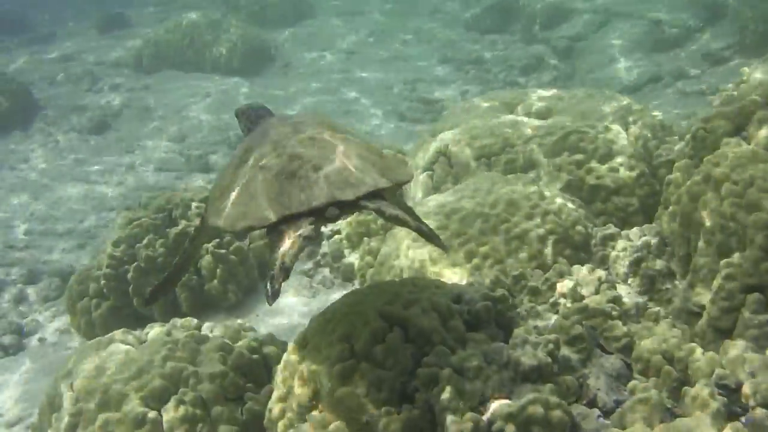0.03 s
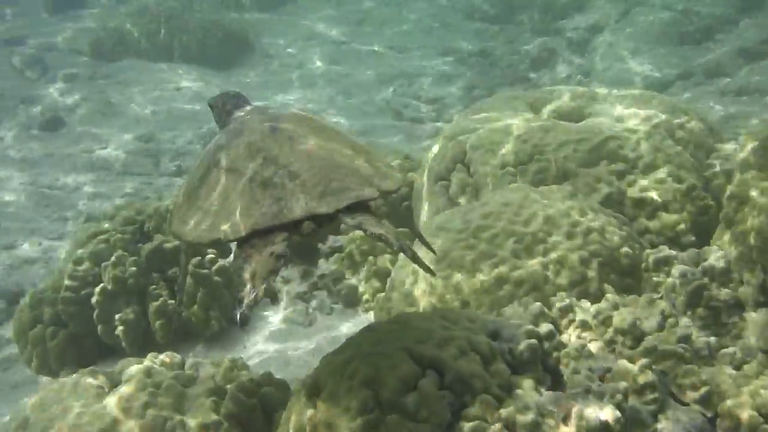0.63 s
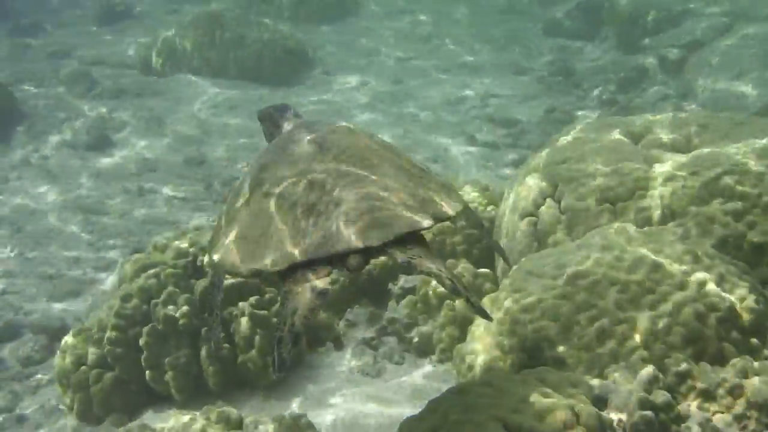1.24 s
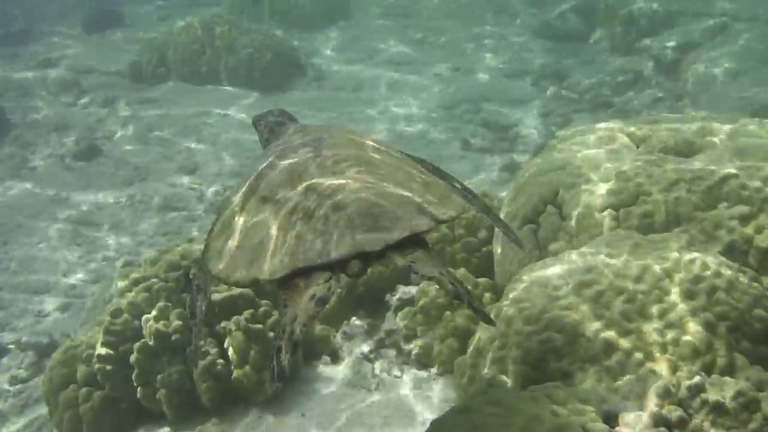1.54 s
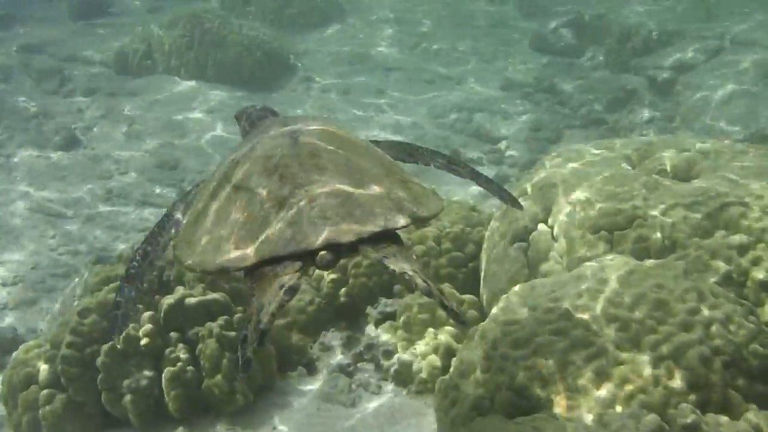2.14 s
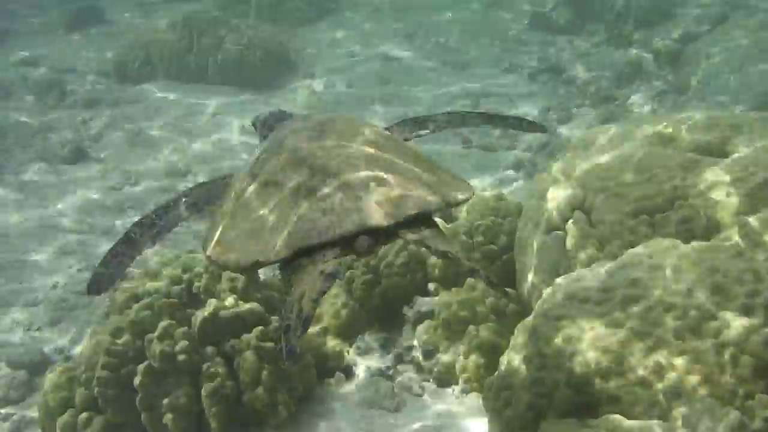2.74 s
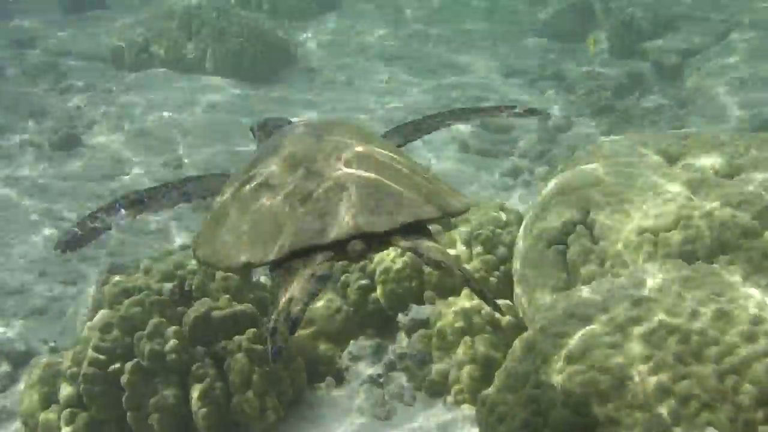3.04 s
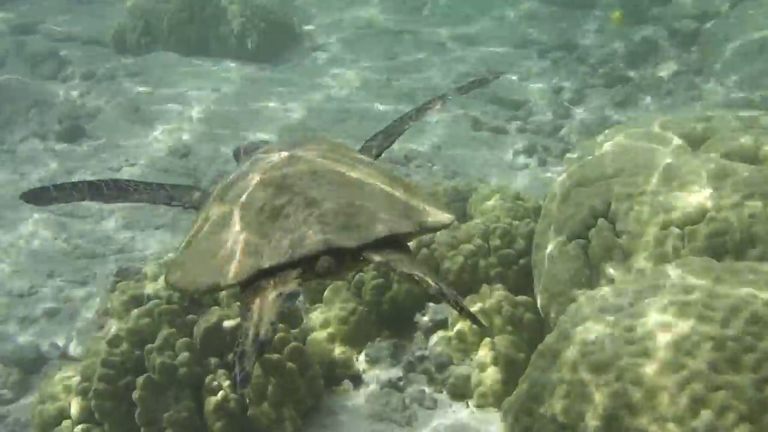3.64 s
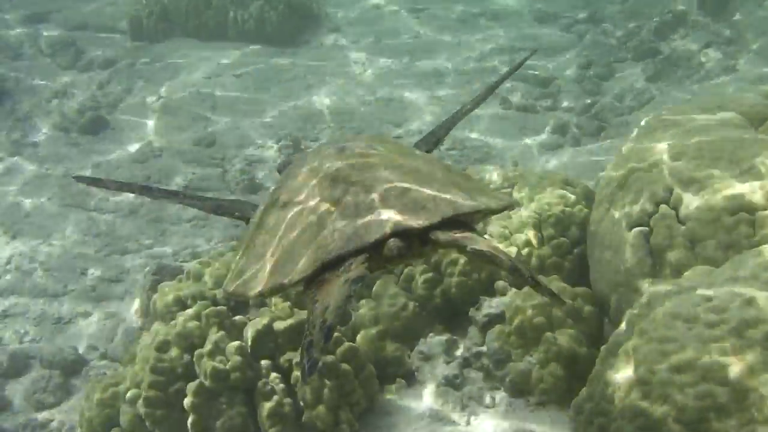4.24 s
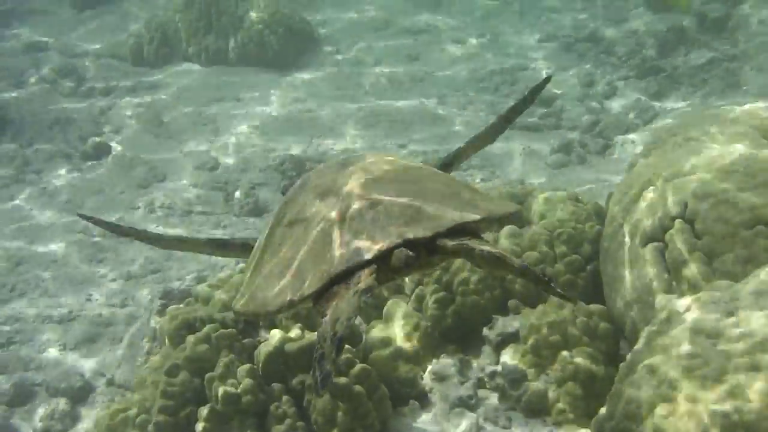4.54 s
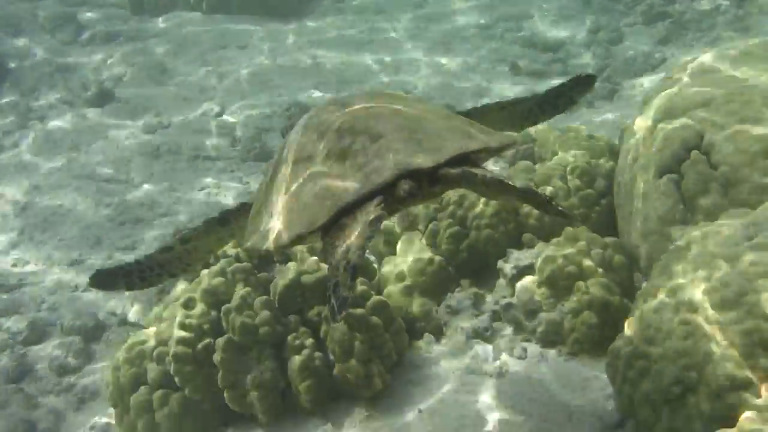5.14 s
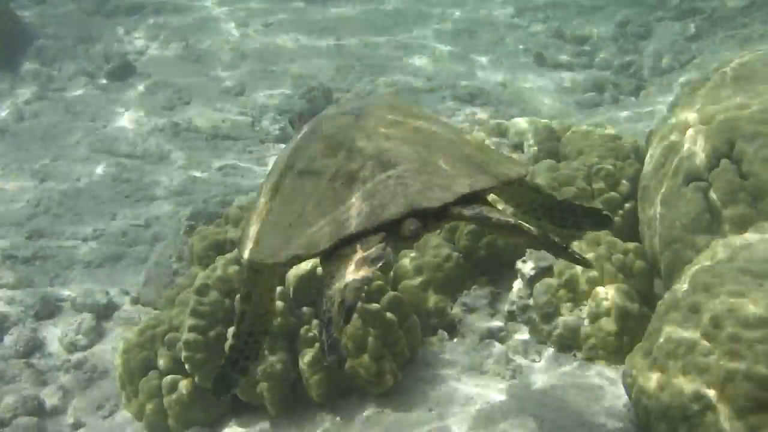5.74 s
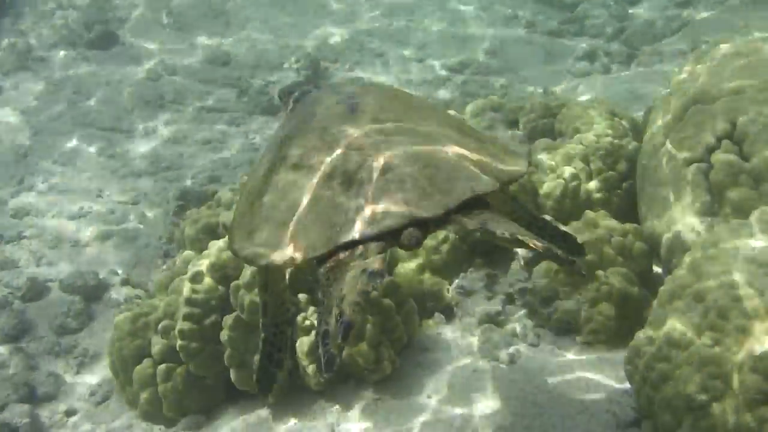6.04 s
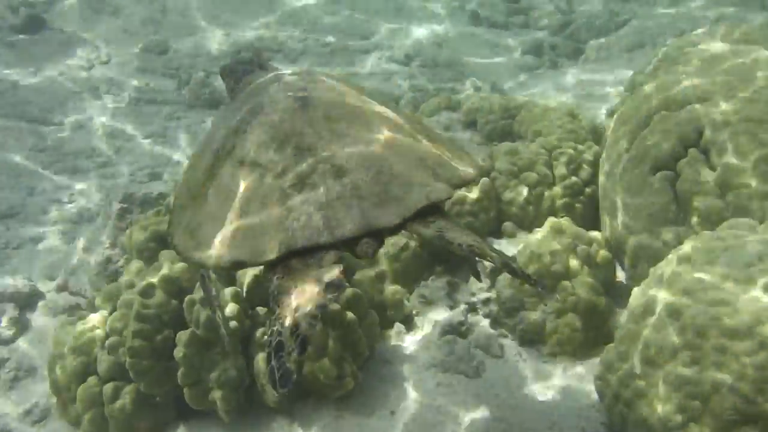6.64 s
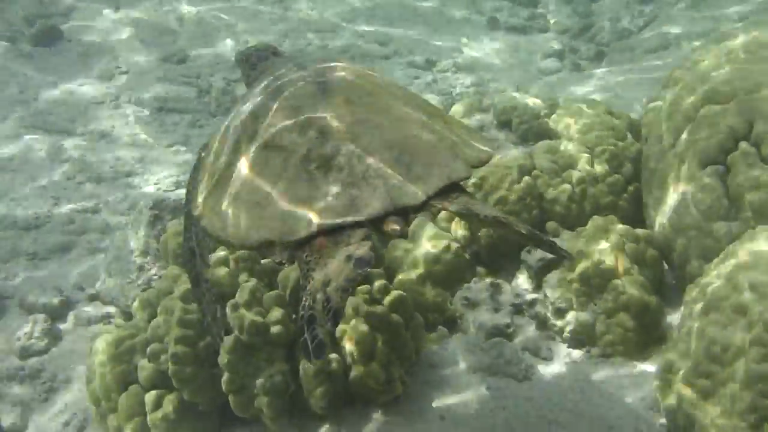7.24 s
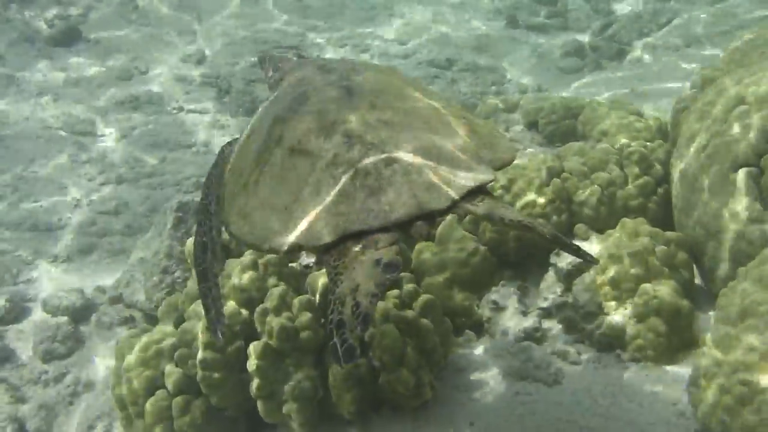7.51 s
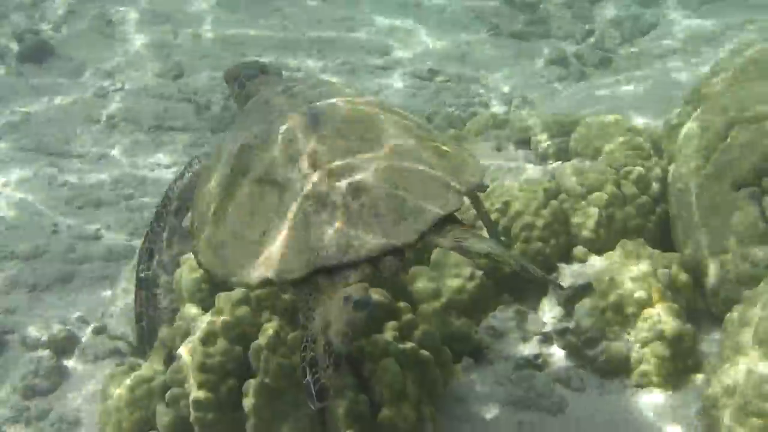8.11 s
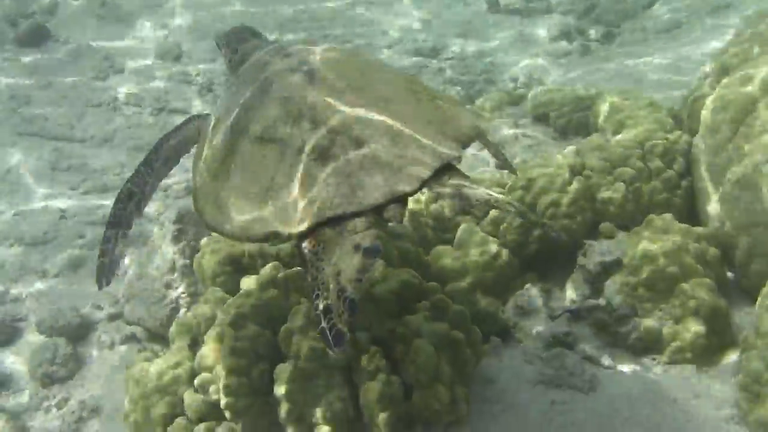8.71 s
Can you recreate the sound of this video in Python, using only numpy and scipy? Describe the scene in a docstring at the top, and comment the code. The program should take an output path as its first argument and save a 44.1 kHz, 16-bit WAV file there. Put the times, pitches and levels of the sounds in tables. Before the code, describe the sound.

Dull, watery knocks bump a waterproof camera housing on a reef, heard from microphones inside it. Water sloshes and gurgles while shrimp snap, sharply nearby and as a faint crackle far off. A small motor whirrs for the first second. Past halfway the knocks and sloshing ebb, leaving a low wash and a few loud cracks. Near the end, bubbles, knocks and the whirr return.

```python
"""A coral reef, heard from a camera drifting after a turtle, microphones inside its waterproof housing.
Closest are dull watery knocks that set the housing ringing, with sloshing water and gurgling bubbles.
Shrimp snap all around as their bubbles collapse: sharp cracks nearby, a crackling hiss far off.
Twice a whirring rush swells up, probably the zoom drive. Underneath lie a steady low wash
and the faint ticking of the camera."""
import sys
import numpy as np
from scipy import signal
from scipy.fft import rfft, irfft, next_fast_len
from scipy.io import wavfile
from scipy.ndimage import map_coordinates

SR = 44100
rng = np.random.default_rng(int(sys.argv[2]) if len(sys.argv) > 2 else 0)


def put_to_file(sound):
    """Save the sound as 16-bit audio at rate SR, in the file named by the first command-line argument."""
    columns = np.atleast_2d(sound).T  # one column per channel
    safe = np.clip(columns, -1, 1)
    whole_steps = np.round(safe * 32767)
    wavfile.write(sys.argv[1], SR, whole_steps.astype(np.int16))


N = 386743


# Knocks on the housing, right at the microphones: t/s, peak level/dB, upper edge f/Hz, lower edge f/Hz
KNOCKS = [(0.0238, -20.5, 680, 89), (0.3503, -11.5, 620, 290), (0.57, -10, 590, 256), (0.768, -4, 580, 336),
          (0.8137, -8.5, 500, 112), (0.929, -26.5, 910, 90), (1.018, -10.5, 590, 412),
          (1.255, -29, 318, 230), (1.711, -19.5, 495, 306), (1.831, -21.5, 600, 260),
          (1.9093, -10, 540, 288), (2.075, -30, 430, 190), (2.5144, -12.5, 450, 306),
          (2.8759, -14, 537, 410), (3.0206, -21.5, 800, 352), (3.077, -31, 335, 190),
          (3.2086, -4, 645, 317), (3.251, -22, 510, 410), (3.3404, -4.5, 710, 308), (3.4346, -12, 410, 260),
          (3.465, -18, 720, 300), (3.5464, -6.5, 720, 350), (3.707, -3, 586, 348), (3.8278, -15, 950, 260),
          (3.848, -10, 430, 352), (3.866, -25.5, 382, 190), (3.974, -15, 407, 300),
          (4.211, -13.5, 510, 250), (4.3356, -14.5, 810, 400), (4.4957, -19.5, 450, 230),
          (4.784, -26, 380, 220), (4.8, -19, 423, 220), (4.8972, -20.5, 440, 230), (5.42, -32, 800, 380),
          (5.892, -31, 600, 200), (7.55, -31, 483, 131), (7.815, -12, 590, 400), (7.841, -13.5, 644, 400),
          (7.854, -9.5, 680, 400), (7.937, -18.5, 520, 260), (7.991, -18.5, 560, 220),
          (8.155, -12, 637, 203), (8.299, -22, 485, 260), (8.398, -5, 626, 480), (8.641, -12.5, 530, 202)]

def knocks(lean_db=-2, small_count=30, soft_hz=520, hard_hz=1000):
    """Dull knocks ring the housing; small ones fall at random, louder when the water moves harder."""
    out, flow = np.zeros((2, N)), flow_db()
    for start, db, high_hz, low_hz in KNOCKS:
        add(out, start, gain(db) * thump(high_hz, low_hz))
    for k, (when, size, hardness, depth) in enumerate(rng.random((small_count, 4))):
        at = int((k + when) / small_count * N)
        ring = thump(high_hz=soft_hz + (hard_hz - soft_hz) * hardness, low_hz=150 * 2 ** (2 * depth - 1))
        add(out, at / SR, gain(flow[at] + 1.5 + 7 * (size + 1)) * ring)
    return panned(out, lean_db)


# Modes of the housing around the microphones: f/Hz, relative level/dB, t60/s
HOUSING_MODES = [(145, -17, 0.041), (270, -25, 0.043), (375, 3.5, 0.029), (555, 2.5, 0.016),
                 (698, -5, 0.034), (1067, 1.5, 0.039), (1580, 9.5, 0.012)]

def thump(high_hz, low_hz, dead_hz=181, dead_width_hz=22):
    """The housing rings after a soft push; a harder push reaches the upper modes."""
    t = np.arange(4096) / SR
    ring = sum(gain(db - 60 * t / t60) * np.cos(2 * np.pi * hz * t) for hz, db, t60 in HOUSING_MODES)
    # the housing barely answers between its two lowest modes
    ring = signal.lfilter(*signal.iirnotch(dead_hz, dead_hz / dead_width_hz, fs=SR), ring)
    ring = cut(cut(ring, low_hz, "high"), high_hz, "low", order=4)
    return ring / abs(ring).max()


# Shrimp close to the housing: t/s, crack level/dB, lower edge f/Hz, treble tilt/(dB per octave),
# main ring f/Hz, its level/dB, second ring f/Hz, its level/dB, left over right/dB
CLOSE_SNAPS = [(0.2585, -14.5, 600, 5.5, 1730, -16, 5150, -21, -1.5),
               (0.3914, -11.5, 5000, -12, 10490, -39, 11550, -50, 0),
               (0.7195, -23, 2800, -2, 5950, -37, 8990, -42, 0),
               (0.813, -10, 600, 0.5, 1900, -11, 5300, -26, -2.5),
               (0.924, -22, 600, 5, 1280, -19, 5000, -27, -6),
               (1.0263, -36, 3400, 0, 5530, -34, 6200, -32, -6),
               (1.0677, -29, 3100, 1, 10400, -40, 11760, -40, 4),
               (1.5288, -9, 5600, -6, 1900, -16.5, 10500, -33, 0),
               (2.161, -18.5, 3000, -2, 2610, -21.5, 6010, -34, 3),
               (2.2774, -21, 2300, -10, 6350, -28, 10400, -35, 5),
               (2.548, -13.5, 3680, -11, 8650, -40, 10210, -39, 3),
               (2.7827, -7, 3450, -12, 5840, -25, 7730, -30, -1),
               (2.9057, -21, 3900, 0, 3310, -29, 6100, -29.5, -5),
               (2.9607, -29, 3600, 4, 5530, -38, 10180, -41, -2),
               (3.0255, -30, 2400, 9, 3600, -34, 8740, -38, -3),
               (3.1611, -26.5, 800, 0, 3150, -31, 4000, -31, 2),
               (3.219, -29, 4500, -2, 5510, -33, 6360, -37, -7),
               (3.3741, -20, 1800, -2, 2830, -26, 5900, -30, 1),
               (3.7083, -30, 2500, 7, 2870, -31, 3820, -33, 1),
               (4.5663, -27, 600, 5, 2830, -22, 5900, -29.5, 1),
               (4.6822, -22, 3100, -18, 6440, -32.5, 4280, -32, -6),
               (4.912, -35, 600, 9, 7140, -40, 8250, -43, 3),
               (5.0802, -35, 8000, 13, 3630, -37, 11250, -37, -1),
               (5.169, -17, 3600, -12, 6600, -45, 7550, -42, -2),
               (5.1886, -37, 8000, 11, 5440, -35, 10860, -46, -2),
               (5.2055, -15, 1800, -3, 6360, -18, 2150, -15.5, -2),
               (5.243, -13, 5100, -2, 6630, -30, 7640, -32, -2),
               (5.271, -22, 5900, -6, 5490, -31, 7140, -45, -8),
               (5.3338, -24.5, 2800, 3.5, 4380, -32, 9720, -42, -3),
               (5.6892, -2.5, 6000, -10, 7800, -30, 9150, -23, -1),
               (5.7434, -22, 7400, -6, 6180, -33, 3970, -38, -9),
               (5.7775, -29, 3300, 4, 6220, -32, 5470, -31, -5),
               (5.957, -31, 3500, 0, 3900, -29, 5460, -39, -8),
               (6.0312, -34, 2400, 2, 5970, -25.5, 4290, -37, -6),
               (6.175, -39, 1800, 6, 3130, -27, 3940, -30, -4),
               (6.1957, -0.5, 4600, -9, 3340, -12.5, 3850, -18, -5),
               (6.2406, -21, 2700, -2, 2700, -18, 6750, -37, 3),
               (6.7395, -31, 3800, 5, 8370, -41, 7090, -41, -4),
               (6.9636, -27, 2900, 1, 10450, -47, 8060, -45, -3),
               (7.054, -30, 3500, -2, 3960, -26, 9880, -46, -3),
               (7.1409, -18, 2500, -8, 5890, -24.5, 9500, -29, 0),
               (7.177, -22, 2300, -8, 6150, -38, 5430, -37, 0),
               (7.2186, -28, 3000, -7, 3720, -22, 2570, -27, -4),
               (7.444, -31, 600, 6, 2830, -29, 8840, -38, 2),
               (7.5237, -24.5, 600, 7, 4000, -24.5, 6500, -33, 0),
               (7.616, -34, 1500, 7, 2890, -37, 11360, -40, 5),
               (7.6345, -19.5, 2300, -2, 2660, -20.5, 5900, -29, 0),
               (7.965, -32, 3700, 6, 10880, -45, 5710, -41, 0),
               (8.6235, -23, 3400, -4, 3480, -23, 7830, -41, -5)]

def shrimp(small_count=110, small_hz=2600):
    """Shrimp snap close by, with smaller snaps scattered at random to either side."""
    out = np.zeros((2, N))
    for start, *voice in CLOSE_SNAPS:
        add(out, start, snap(*voice))
    for when, size, main, second, side in rng.random((small_count, 5)):
        db = -40 - 2 * np.log(size + 0.03)
        small = snap(db, edge_hz=3200, tilt_db=0, main_hz=small_hz * 2 ** main, main_db=db - 4,
                     second_hz=1.45 * small_hz * 2 ** second, second_db=db - 4, lean_db=10 * side - 7)
        add(out, when * N / SR, small)
    return out


# A crack as it reaches the microphones through the wall: f/Hz, gain/dB
CRACK_SPECTRUM = [(300, 1), (1100, 12), (2100, 8.5), (3000, 1.5), (4200, -1.5), (5200, -11), (6200, -8),
                  (7500, -18.5), (10000, -12), (12000, -26), (13500, -38), (15500, -38)]

def snap(crack_db, edge_hz, tilt_db, main_hz, main_db, second_hz, second_db, lean_db,
         rise_s=0.00028, crack_t60=0.008, tail_t60=0.073, ring_t60=0.006, treble_hz=4000):
    """A collapsing bubble cracks against the wall, which rings at two pitches for a few milliseconds."""
    t = np.arange(2048) / SR
    rise = 1 - np.exp(-t / rise_s)
    decay = gain(-60 * t / crack_t60) + gain(-29 - 60 * t / tail_t60)
    burst = rng.standard_normal((2, len(t))) * rise * decay
    colour = [(hz, db + tilt_db * max(np.log2(hz / treble_hz), 0)) for hz, db in CRACK_SPECTRUM]
    crack = gain(crack_db) * cut(coloured(burst, colour, size=512), edge_hz, "high", order=3)
    ring = sum(gain(db) * np.sin(2 * np.pi * (hz * t + rng.random() + rng.random((2, 1)) / 2))
               for hz, db in ((main_hz, main_db), (second_hz, second_db)))
    return panned(crack + ring * rise * gain(-60 * t / ring_t60), lean_db)


# Runs of the drive, inside the housing with the microphones: start t/s, end t/s, level/dB,
# fade/(dB per s), relative speed, greatest strain t/s, swell there/dB
DRIVE_RUNS = [(-.3, 1.22, -32, 6, 0.98, 0.86, 3.5), (7.86, 8.77, -36, 2, 0.99, 8.25, 5.5)]
# Its resonances: f/Hz, width/Hz, relative level/dB in the first run, and in the second
DRIVE_MODES = [(177, 76, -23, -31), (368, 74, -8.5, -6), (479.7, 180, -2.5, -5.5), (540.5, 38, -4, -12),
               (761, 66, -12.5, -9.5), (1159, 53, -11, -8), (1634, 78, -25, -15), (1688, 330, -13, -19.5),
               (2050, 180, -29, -38)]
DRIVE_STOP_DB_PER_S = 265

def drive_whirr(kick_db=9.5, kick_s=0.04, overspeed=0.045, settle_s=0.2, strain_width_s=0.064):
    """A rough drive shakes resonances that follow its speed; it kicks in, swells under strain, stops."""
    out, size = np.zeros((2, N)), 2 * SR
    for run, (start, end, db, fade_db_per_s, speed, strain_at, swell_db) in enumerate(DRIVE_RUNS):
        t = max(start - 0.2, 0) + np.arange(size) / SR
        age = np.maximum(t - start, 0)
        pace = 1 + overspeed * np.exp(-age / settle_s) + 0.0056 * wander(7.8)[:size]
        travel = speed * np.cumsum(pace) / SR
        body = sum(gain(mode_db[run]) * resonance(hz * travel, width)
                   for hz, width, *mode_db in DRIVE_MODES)
        strain = np.exp(-((t - strain_at) / strain_width_s) ** 2)
        level = db + kick_db * np.exp(-age / kick_s) - fade_db_per_s * age + swell_db * strain
        level += held_db(t, start, end, 392, DRIVE_STOP_DB_PER_S)
        throb_db = 2 * wander(38)[:size]
        add(out, t[0], panned(unit_rms(body) * gain(level + throb_db), lean_db=-2.5))
    return cut(out, 135, "high", order=4)


def drive_hum(start=0.75, end=1.22, hz=533.6, level_db=-35.5, rough=0.42, sag_db_per_s=9):
    """Late in its first run the loaded drive holds a rough, wavering tone until it stops."""
    t = np.arange(N) / SR
    turns = np.cumsum(hz * (1 + 0.0117 * wander(11.9))) / SR
    pure = unit_rms(np.sin(2 * np.pi * turns))
    tone = unit_rms((1 - rough) * pure + rough * resonance(turns, width_hz=64))
    level = level_db + held_db(t, start, end, 35, DRIVE_STOP_DB_PER_S)
    level -= sag_db_per_s * np.maximum(t - start, 0)
    return panned(tone * gain(level + 3 * wander(24)), lean_db=-3)


# Larger bubbles, clear at the microphones: centre t/s, peak level/dB, f/Hz, half-length/s
BUBBLES = [(0.666, -19.5, 497, 0.012), (.716, -29, 528, 0.017), (.978, -25.5, 523, .024),
           (1.916, -16, 311, 0.0085), (2.866, -22, 406, 0.012), (4.956, -36.5, 513, .011),
           (5.463, -35.5, 480, .012), (5.885, -34.5, 603, 0.012), (6.329, -38.5, 390, .008),
           (6.952, -36, 410, .01), (7.029, -34, 386, 0.013), (7.083, -35.5, 391, .011),
           (7.521, -36.5, 420, .009), (7.807, -23, 430, 0.0085), (7.822, -16, 546, 0.0091),
           (7.844, -7.5, 555, 0.0058), (7.8542, -7.5, 454, 0.007), (7.869, -18, 595, 0.006)]

def gurgles(pitch_rise=0.066, faint_count=80, swell_cycles=5.425):
    """Each bubble swells and fades, rising a little in pitch; faint ones come at random."""
    out = np.zeros((2, N))
    when, size, pitch = rng.random((faint_count, 3)).T
    faint_hz = 480 * 2 ** (0.8 * (pitch - 0.5))
    faint = zip(when * N / SR, -39.7 + 6 * (size - 0.5), faint_hz, swell_cycles / faint_hz)
    for centre, db, hz, half_s in BUBBLES + list(faint):
        t = np.arange(-half_s, half_s, 1 / SR)
        turns = np.cumsum(hz * (1 + pitch_rise * t / half_s)) / SR + rng.random()
        add(out, centre - half_s, gain(db) * np.hanning(len(t)) * np.sin(2 * np.pi * turns))
    return cut(panned(out, lean_db=2), 106, "high")


# Surges of water along the outside of the housing: start t/s, hold/s, flow level/dB
SURGES = [(0, 0.78, -38.5), (1.713, 0.13, -39), (2.342, 0.49, -40.5), (3.068, 0.96, -39),
          (4.316, 0.19, -40.5), (7.344, 0.13, -49), (7.836, 1, -38.5)]

def flow_db(calm_db=-57.5):
    """How hard the water moves at every sample: surges build quickly and ebb back to calm."""
    t = np.arange(N) / SR
    surges = [db + held_db(t, start, start + hold, rise_db_per_s=182, fall_db_per_s=14.5)
              for start, hold, db in SURGES]
    return np.maximum(np.max(surges, axis=0), calm_db)


def slosh():
    """Moving water gives the housing small pushes and keeps two of its resonances humming."""
    t = np.arange(N) / SR
    burble = signal.oaconvolve(clicks(per_s=600, spread_db=2.6), thump(624, 557))[:N]
    patter = signal.oaconvolve(clicks(per_s=30, spread_db=5.3), thump(580, 138))[:N]
    pushes = gain(-2) * unit_rms(burble) + gain(-7) * unit_rms(patter)
    swirl = gain(-6) * resonance(410 * t, width_hz=70)
    hollow = gain(-12) * resonance(1060 * t, width_hz=50)
    level = flow_db() + 2 * wander(17)
    return panned((pushes + swirl + hollow) * gain(level), lean_db=-0.81)


# Puffs of tiny bubbles, faint at the microphones:
# centre t/s, level/dB, f/Hz, half-length/s, spread and glide as shares of the pitch
BUBBLE_PUFFS = [(0.315, -54.5, 4270, 0.12, 0.71, 0), (0.848, -41.5, 2830, 0.035, 0.05, -0.19),
                (0.84, -49, 6200, 0.078, 0.68, 0.021), (0.908, -50, 8260, 0.024, 0.32, 0.018),
                (2.744, -43, 3500, 0.028, 0.088, -0.023), (4.09, -47.5, 3730, 0.039, 0.22, 0.033),
                (4.737, -44.5, 4220, 0.026, 0.14, .1)]

def fizz():
    """Tiny bubbles of similar size ring together; a puff may slide up or down in pitch."""
    out = np.zeros((2, N))
    for centre, db, hz, half_s, spread, glide in BUBBLE_PUFFS:
        size = round(2 * half_s * SR)
        noise = rng.standard_normal((2, 8192))[:, :size]
        band = cut(noise, hz / (1 + spread), "high", order=6)
        band = cut(band, hz * (1 + spread), "low", order=8)
        progress = np.arange(size) / size
        warped = size * (progress + glide * progress * (progress - 1))
        puff = np.array([map_coordinates(side, [warped]) for side in band])
        add(out, centre - half_s, gain(db) * unit_rms(puff) * np.hanning(size) ** 2)
    return out


# Shrimp far across the reef, heard through the housing: f/Hz, relative level/dB
CRACKLE_SPECTRUM = [(450, -34), (820, -5.5), (980, 4), (1180, 2), (1350, 6.5), (1520, -2.5), (1680, 1.5),
                    (1950, -6.5), (2900, -10.5), (3900, -12.5), (4800, -18.5), (6200, -18), (7500, -22),
                    (11200, -24.5), (12400, -35), (13400, -68)]

def far_shrimp(grain_db=-13, flicker_db=1.43):
    """Countless far shrimp merge into a hiss; nearer ones stand out as grains."""
    far = unit_rms(rng.standard_normal((2, N)))
    grains = clicks(per_s=100, spread_db=4.5)
    grains = unit_rms(np.array([grains, grains * rng.choice([-1, 1], N)]))
    hiss = coloured(microphone_pair(far + gain(grain_db) * grains), CRACKLE_SPECTRUM)
    return unit_rms(hiss) * gain(-44.5 + 2 + flicker_db * wander(56))


# The wash of the reef, all around the housing: f/Hz, relative level/dB
WASH_SPECTRUM = [(30, -46), (60, -32), (120, -15.5), (200, -11), (290, -9), (370, -4.5), (440, 3),
                 (530, -2), (610, 0), (720, -10), (820, -24), (1000, -35), (1500, -60.5)]

def reef_wash(level_db=-46, flicker_db=2):
    """The water makes a steady low rush whose level flickers slightly."""
    rush = coloured(microphone_pair(rng.standard_normal((2, N))), WASH_SPECTRUM)
    return unit_rms(rush) * gain(level_db + flicker_db * wander(28))


# The camera's tick, beside the microphones: f/Hz, relative level/dB
TICK_SPECTRUM = [(1000, -6), (3000, 4), (5500, 2.5), (8000, -2.5), (11300, 0.5), (12500, -9),
                 (13500, -53)]

def camera_ticks(level_db=-64, rate_hz=59.94, t60=0.004):
    """The camera gives a tiny tick with every picture that it takes."""
    since_tick = (np.arange(N) / SR - 0.0085) % (1 / rate_hz)
    ticks = rng.standard_normal((2, N)) * gain(-60 * since_tick / t60)
    return gain(level_db) * unit_rms(coloured(ticks, TICK_SPECTRUM))


# Likeness of the two microphones inside the housing: f/Hz, correlation
MIC_LIKENESS = [(100, -0.81), (450, 0.009), (780, -0.0081), (1100, -0.11), (1400, 0.75), (1900, 0.44),
                (2400, -0.14), (3300, -0.55), (9000, -0.023), (13000, -0.2)]
# Their balance: f/Hz, left over right/dB
MIC_BALANCE = [(100, 1.5), (400, 7.5), (750, 2.5), (1050, 6), (1350, -0.5), (1650, 4.5), (2400, 1.5),
               (3300, -0.5), (7000, -1), (11500, 5)]

def microphone_pair(pair):
    """Blends two unrelated signals into what the two microphones share inside the housing."""
    size = next_fast_len(N)
    left, other = rfft(pair, size)
    hz = np.fft.rfftfreq(size, 1 / SR)
    likeness = np.clip(curve_at(MIC_LIKENESS, hz), -1, 1)
    lean = gain(curve_at(MIC_BALANCE, hz) / 2)
    right = likeness * left + np.sqrt(1 - likeness ** 2) * other
    return irfft(np.array([left * lean, right / lean]), size)[:, :N]


def resonance(turns, width_hz):
    """A narrow resonance shaken at random; turns counts the cycles of its centre pitch."""
    real, imag = cut(rng.standard_normal((2, len(turns))), width_hz / 2, "low")
    return unit_rms(((real + 1j * imag) * np.exp(2j * np.pi * turns)).real)


def clicks(per_s, spread_db):
    """A random train of clicks, a few of them large."""
    size = gain(spread_db * np.minimum(rng.exponential(1, N), 4))
    return size * rng.choice([-1, 1], N) * (rng.random(N) < per_s / SR)


def wander(rate_hz):
    """A smooth random drift with an rms of one."""
    hz = np.fft.rfftfreq(N, 1 / SR)[:2000]
    slow = irfft(np.exp(-(hz / rate_hz) ** 2 + 2j * np.pi * rng.random(len(hz))), 8192)
    return unit_rms(np.interp(np.linspace(0, len(slow), N), np.arange(len(slow)), slow))


def held_db(t, start, end, rise_db_per_s, fall_db_per_s):
    """An envelope in dB: rises to zero at start, holds, and falls after end."""
    return -rise_db_per_s * np.maximum(start - t, 0) - fall_db_per_s * np.maximum(t - end, 0)


def coloured(x, points, size=2048):
    """Causal filter with a given spectrum: clicks stay sharp and ring afterwards."""
    hz = abs(np.fft.fftfreq(size, 1 / SR))
    log_gain = np.log(gain(np.maximum(curve_at(points, hz), -100)))
    taps = np.fft.ifft(np.exp(signal.hilbert(log_gain).conj())).real[:size // 2]
    return signal.oaconvolve(x, taps[None], axes=1)[:, :x.shape[1]]


def curve_at(points, hz):
    """Interpolates a curve on a log-frequency axis."""
    point_hz, value = np.transpose(points)
    return np.interp(np.log(hz + 1), np.log(point_hz + 1), value)


def cut(x, hz, kind, order=2):
    """High-pass or low-pass."""
    return signal.sosfilt(signal.butter(order, min(hz, SR / 2 - 100), kind, fs=SR, output="sos"), x)


def add(mix, start, sound):
    """Mixes a sound into both channels at start, in seconds."""
    part = mix[:, max(round(start * SR), 0):][:, :sound.shape[-1]]
    part += sound[..., :part.shape[1]]


def panned(x, lean_db):
    """Leans a sound toward the left microphone by so many dB."""
    return x * gain([[lean_db / 2], [-lean_db / 2]])


def gain(db):
    """Decibels to gain."""
    return 10 ** (np.asarray(db) / 20)


def unit_rms(x):
    """Scales to an rms of one."""
    return x / np.sqrt(np.mean(x ** 2) + 1e-20)


def scene():
    """The reef and the camera's own noises meet at the microphones inside the housing."""
    close = knocks() + shrimp() + drive_whirr() + drive_hum() + gurgles() + slosh() + fizz()
    return close + far_shrimp() + reef_wash() + camera_ticks()


def record(dry, edge_hz=15800):
    """The camera cuts off the highest treble."""
    taps = signal.firwin(511, edge_hz, window=("kaiser", 9), fs=SR)
    return signal.oaconvolve(dry, taps[None], "same")


dry = scene()
out = record(dry)
put_to_file(out)
```